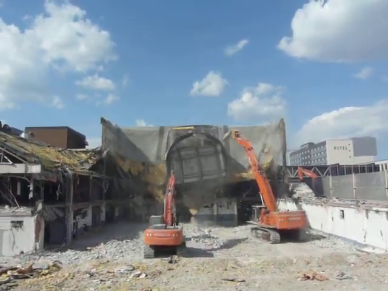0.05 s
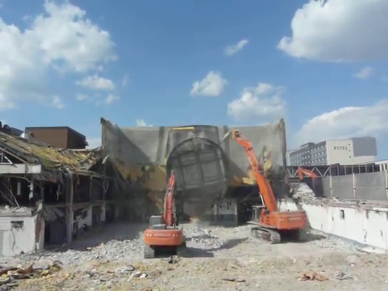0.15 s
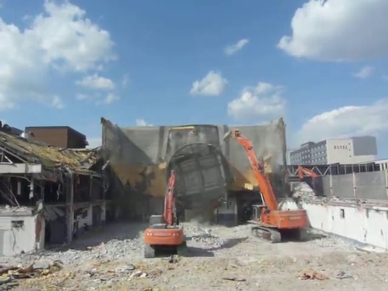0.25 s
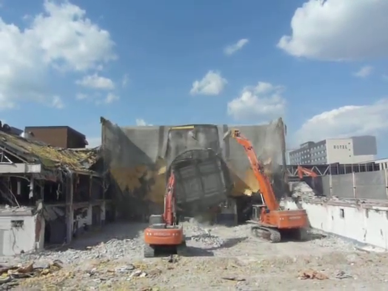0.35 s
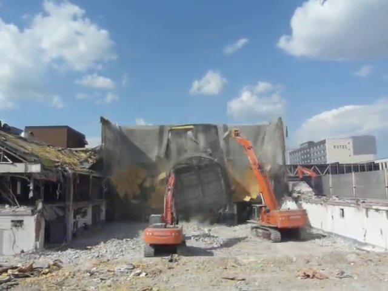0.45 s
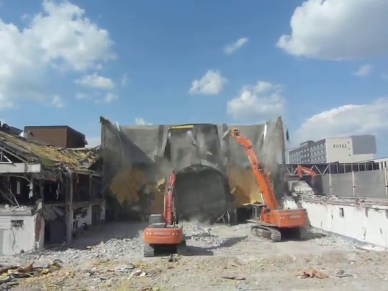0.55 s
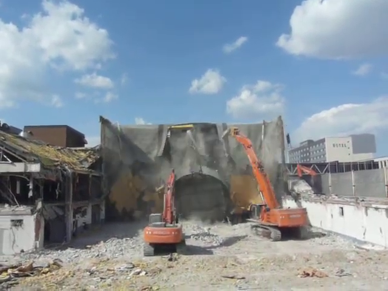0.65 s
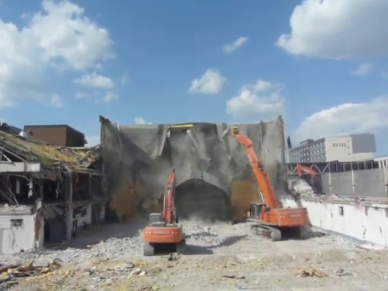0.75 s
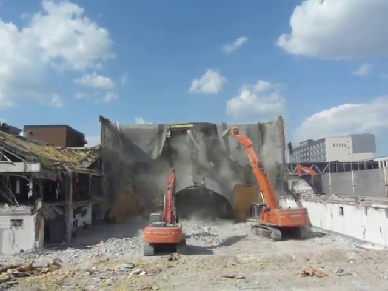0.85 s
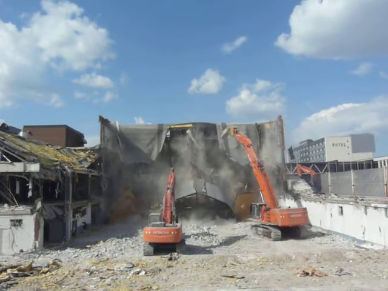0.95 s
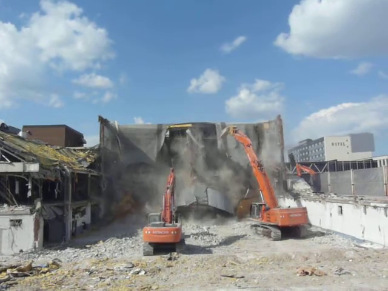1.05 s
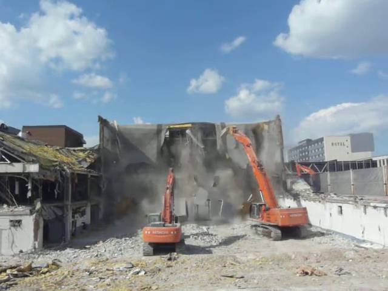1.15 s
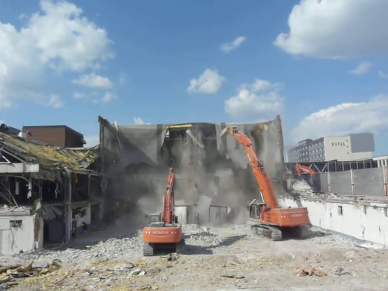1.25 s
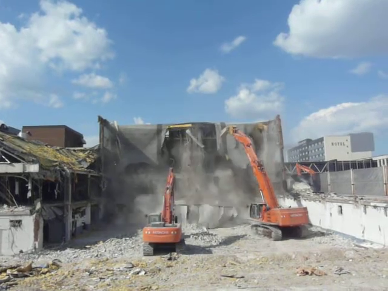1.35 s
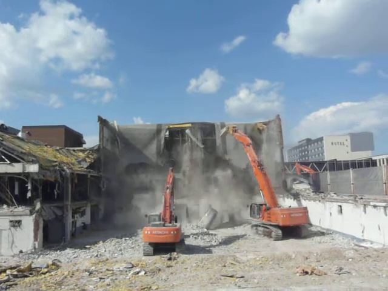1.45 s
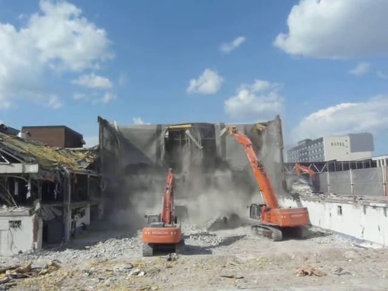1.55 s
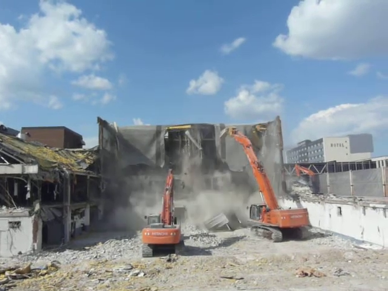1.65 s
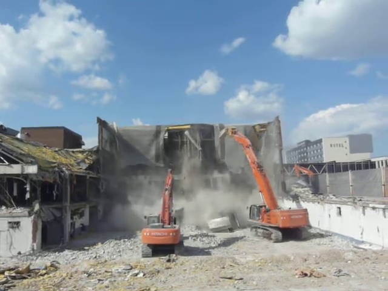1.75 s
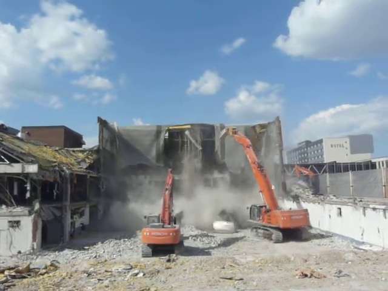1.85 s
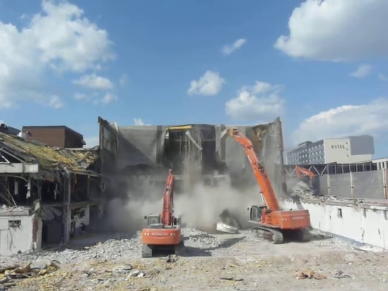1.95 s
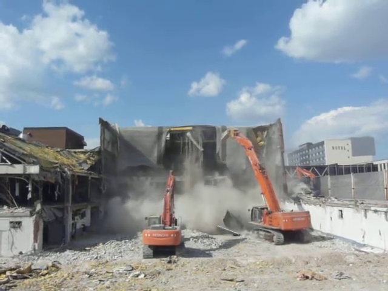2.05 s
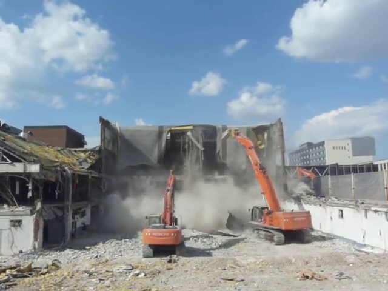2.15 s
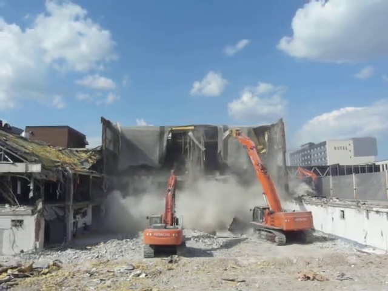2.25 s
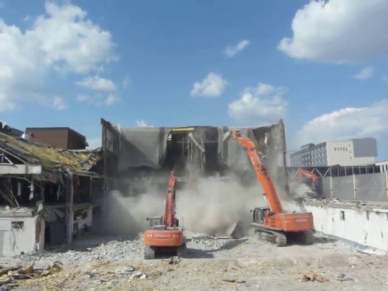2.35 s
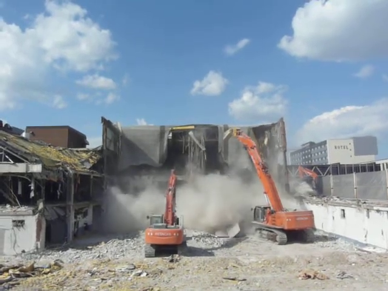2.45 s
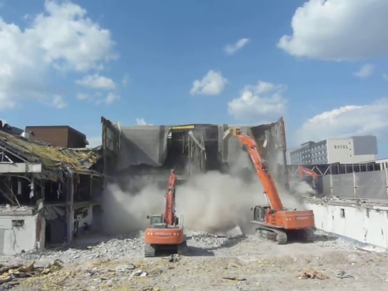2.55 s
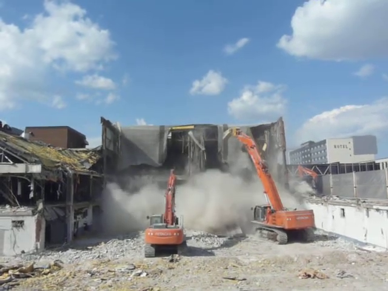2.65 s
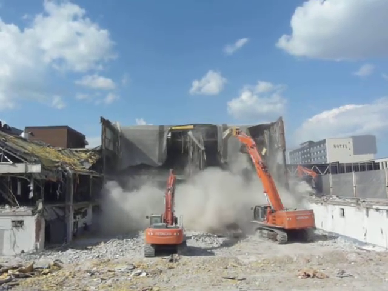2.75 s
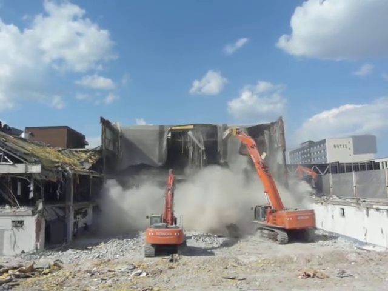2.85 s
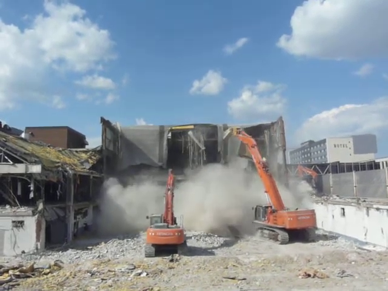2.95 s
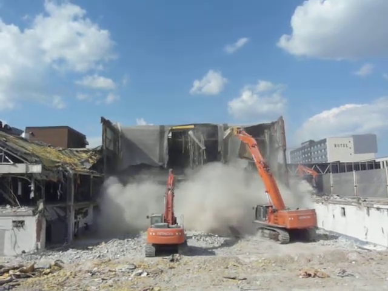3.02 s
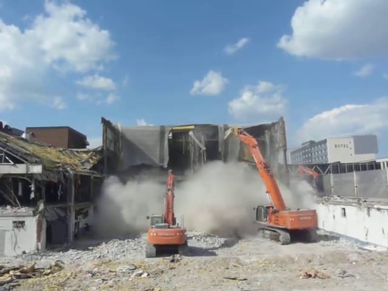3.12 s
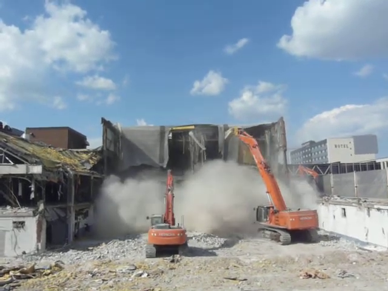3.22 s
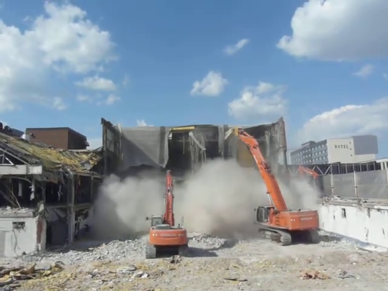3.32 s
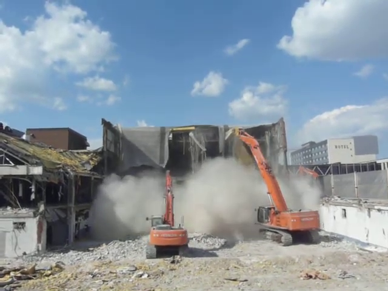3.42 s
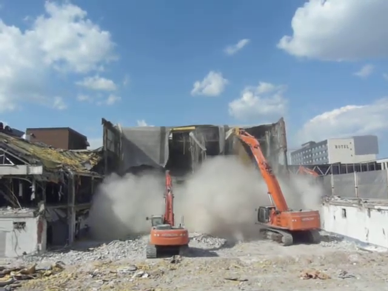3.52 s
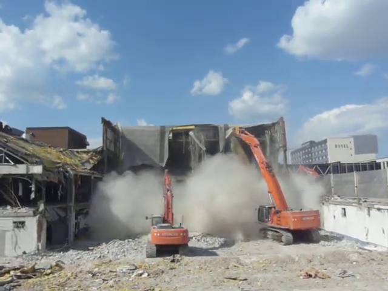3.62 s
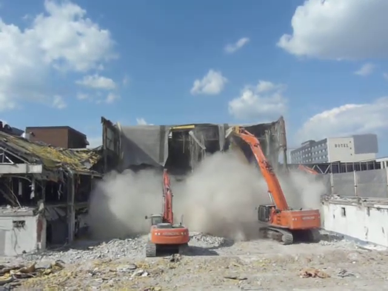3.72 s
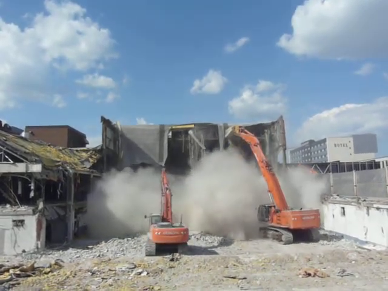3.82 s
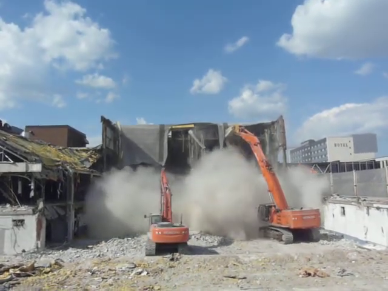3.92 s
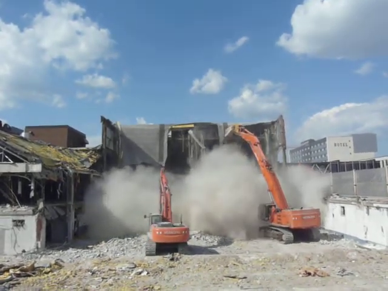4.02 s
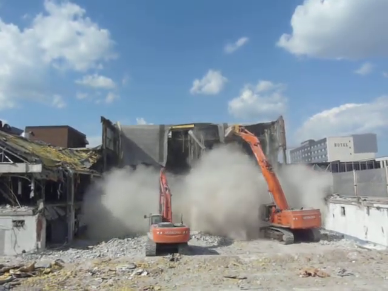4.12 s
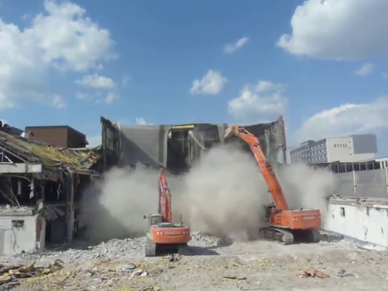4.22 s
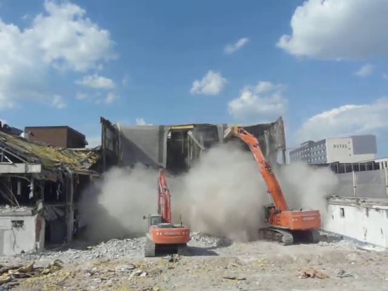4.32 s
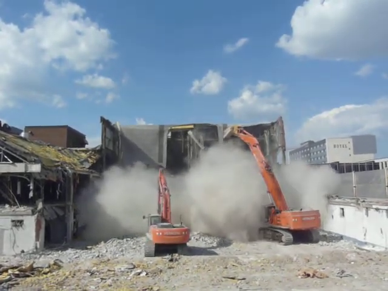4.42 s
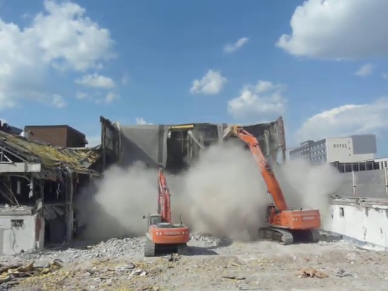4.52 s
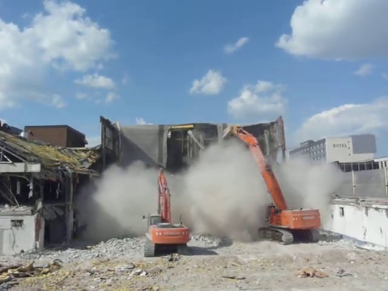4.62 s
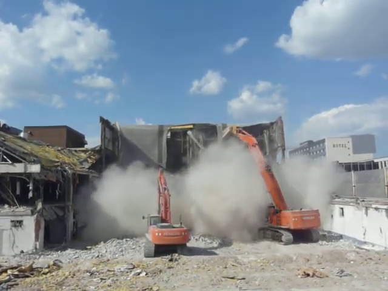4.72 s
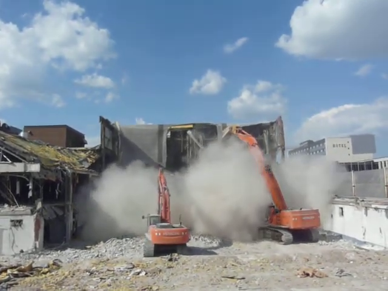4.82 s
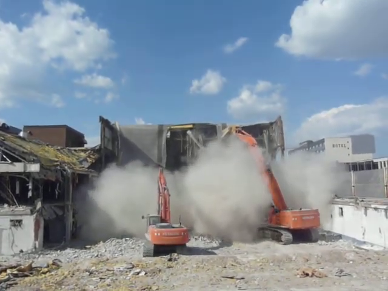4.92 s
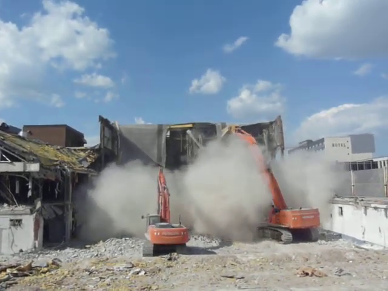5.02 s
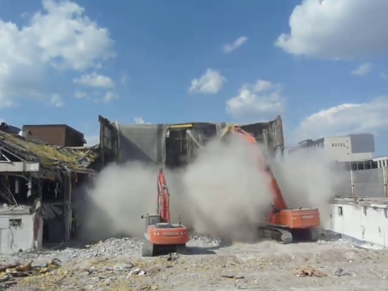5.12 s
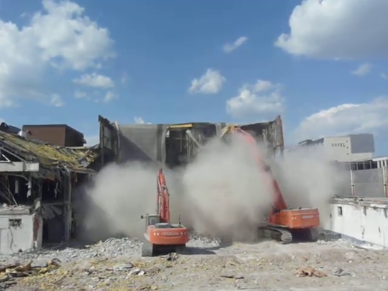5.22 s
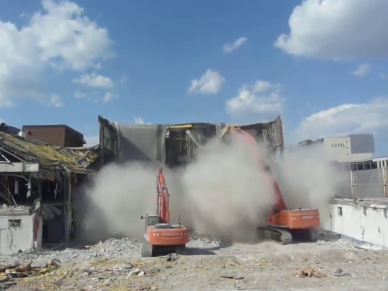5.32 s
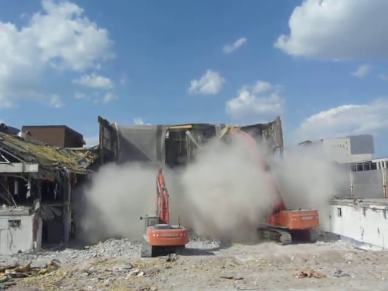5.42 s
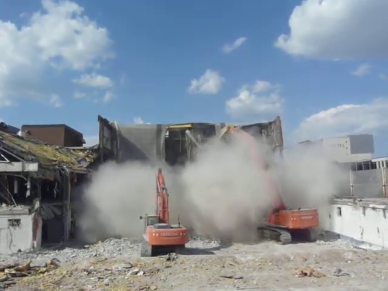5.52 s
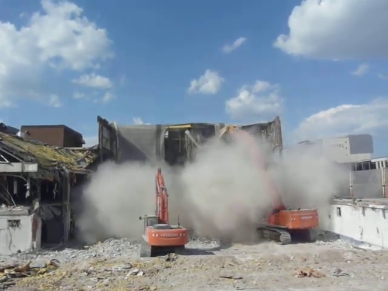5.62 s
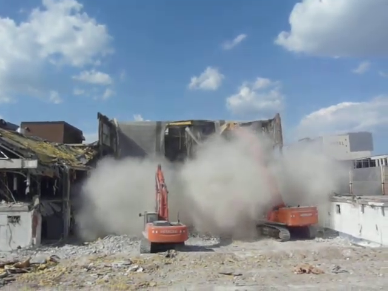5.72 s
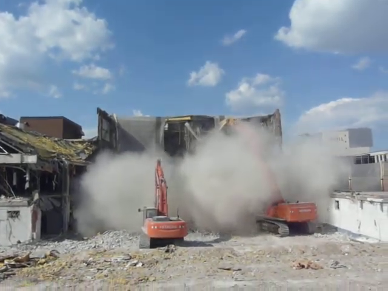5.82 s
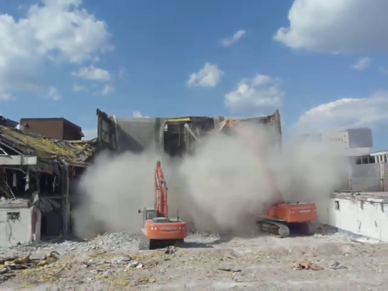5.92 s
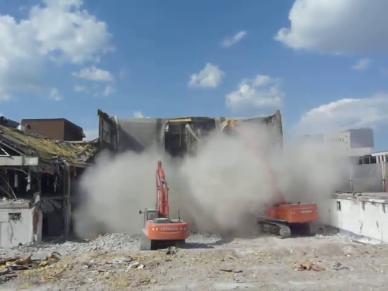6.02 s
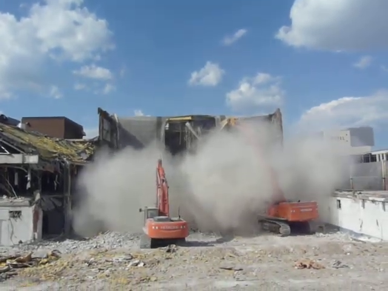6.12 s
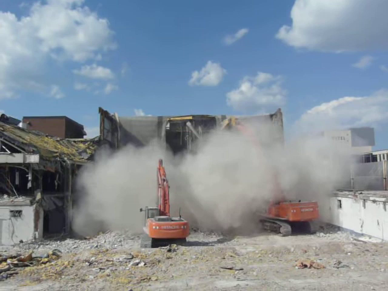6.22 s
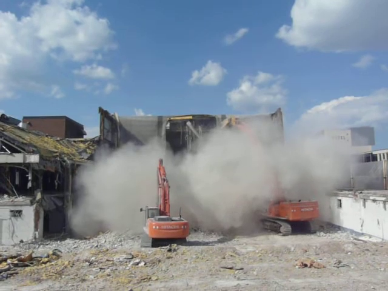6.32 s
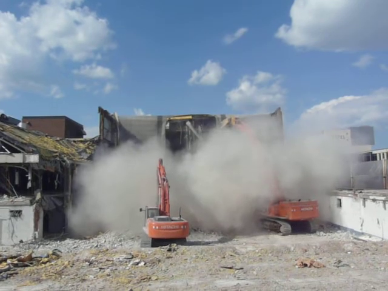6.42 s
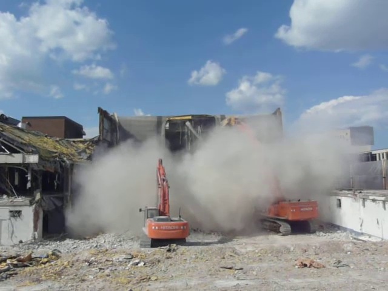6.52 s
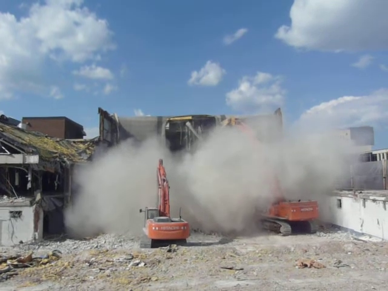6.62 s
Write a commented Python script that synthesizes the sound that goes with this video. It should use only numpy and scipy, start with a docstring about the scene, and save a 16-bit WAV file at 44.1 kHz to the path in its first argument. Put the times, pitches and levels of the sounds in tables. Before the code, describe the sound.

Outdoors, concrete rubble roars down, thins to a trickle, then slides and thuds again over low diesel drone, groaning machinery and brief metal squeals.

```python
"""A wall comes down on a demolition site, heard from across the yard.
Two diesel excavators beat, drone and groan as summed tones, over ground rumble of filtered contacts.
Slabs, blocks, bricks and grit pour down as streams of short rings; bursts of contacts thud, then also crack,
and the remaining walls throw these blows back. After a lull the heap gives way in short slides,
and steel squeals as resonating noise. A dull recorder rounds the peaks and adds one faint tick near 1 s."""
import sys
import numpy as np
from scipy import signal
from scipy.io import wavfile

SR = 44100
rng = np.random.default_rng(int(sys.argv[2]) if len(sys.argv) > 2 else 0)


def pcm_store(signal):
    """Save signal as 16-bit PCM."""
    levels = np.round(np.clip(np.atleast_2d(signal), -1, 1) * 32767)
    wavfile.write(sys.argv[1], SR, levels.astype(np.int16).T)


N = 293706
TIME = np.arange(N) / SR  # seconds


def from_db(db):
    """Decibels to gain."""
    return 10 ** (np.asarray(db) / 20)


def rms(x):
    """Root mean square level."""
    return np.sqrt(np.mean(x ** 2))


def rms_one(x):
    """Scale to rms 1."""
    return x / np.sqrt(np.mean(x ** 2) + 1e-20)


def in_time(rows):
    """Each column of a curve table at every sample."""
    seconds, *columns = np.transpose(rows)
    return [np.interp(TIME, seconds, column) for column in columns]


def at_hz(points, hz):
    """Read a spectrum on a log-frequency axis."""
    points_hz, values = np.transpose(points)
    return np.interp(np.log(hz), np.log(points_hz), values)


def band(x, low_hz, high_hz, order=2):
    """Butterworth band-pass."""
    edges = [low_hz, min(high_hz, .45 * SR)]
    sos = signal.butter(order, edges, "band", fs=SR, output="sos")
    return signal.sosfilt(sos, x + 1e-18)


def drift(rate_hz):
    """Slow chance with spread 1: noise through two equal low-pass poles at rate_hz."""
    step = 40  # samples between slow values
    r = np.exp(-2 * np.pi * step * rate_hz / SR)
    noise = rng.standard_normal(N // step + 2002)
    slow = signal.lfilter([1], [1, -2 * r, r * r], noise)[2000:]  # skip the filter's onset
    return np.interp(np.arange(N) / step, np.arange(len(slow)), rms_one(slow))


def resonate(x, hz, width_hz):
    """One resonance with gain 1 on top."""
    r = np.exp(-np.pi * width_hz / SR)
    numerator = np.array([1, 0, -1]) * (1 - r * r) / 2
    denominator = [1, -2 * r * np.cos(2 * np.pi * hz / SR), r * r]
    return signal.lfilter(numerator, denominator, x + 1e-18)


def add(out, s, sound):
    """Mix a sound in at time s."""
    start = int(np.clip(round(s * SR), 0, N - 1))
    out[start:start + len(sound)] += sound[:N - start]


def gate(s, attack, hold, release):
    """Rises to 1 from time s, stays until hold seconds after s, then falls to 0."""
    rise = (TIME - s) / attack
    fall = 1 - (TIME - s - hold) / release
    return np.clip(np.minimum(rise, fall), 0, 1)


def knocks(per_s, spread_db, size):
    """Random contacts of either sign: many light ones, a few heavy."""
    chance, weight = rng.random((2, size))
    at = np.flatnonzero(chance < per_s / SR)
    heaviness = np.minimum(-np.log(weight[at] + 1e-9), 4)
    clicks = np.zeros(size)
    clicks[at] = from_db(spread_db * heaviness) * (-1.) ** at
    return clicks


# The ground shaking. Each row: time in seconds, level in dB before the trim in ground().
GROUND_SHAKE = [(0.0, -45), (0.33, -49), (0.95, -41.5), (2.99, -56), (5.47, -41), (5.77, -45),
                (6.66, -43.5)]


def ground(trim_db=-1.5):
    """The heap passes the blows into the ground as a low rumble: contacts kept between 60 and 120 Hz."""
    level_db, = in_time(GROUND_SHAKE)
    rumble = band(knocks(470, 3.5, size=N), 60, 120, order=3)
    return from_db(level_db + trim_db) * rms_one(rumble)


# Effort of the engines. Each row: time in seconds, load from 0 to 1.
ENGINE_LOAD = [(0, .1), (1.5, .2), (3.0, 0), (3.7, .2), (3.82, .85), (4.8, .75), (6.66, 1)]


def excavators():
    """One diesel beats low and steady; the other drones unevenly. Load makes both louder and lifts the drone."""
    load, = in_time(ENGINE_LOAD)
    beat_db = -62 + 11 * load
    drone_db = -50 + 11 * load
    drone_hz = 121.3 + 11 * load
    beat_hz = 46.6 * (1 + 0.013 * drift(1.9))
    firing = 2 * np.pi * np.cumsum(beat_hz) / SR
    beat = np.sin(firing) + from_db(-9.0) * np.sin(2 * firing)
    turning = 2 * np.pi * np.cumsum(drone_hz * (1 + .018 * drift(12))) / SR
    # the drone swells and dips about 6.7 times a second, with chance on top
    swell = np.sin(2 * np.pi * 6.7 * TIME + drift(2))
    throb = 1 + 0.23 * swell + .4 * drift(14)
    drone = (np.sin(turning) + from_db(-9) * np.sin(2 * turning)) * throb
    return from_db(beat_db) * rms_one(beat) + from_db(drone_db) * rms_one(drone)


# The machines groan as they pull. Each row: start in seconds, length in seconds, centre pitch in Hz, level in dB.
PULLS = [(0, 3.1, 271, -37), (4.567, 0.22, 261, -35), (5.4, 0.27, 221.7, -36), (5.83, 0.28, 229, -33),
         (6.292, 0.58, 227, -38)]


def groans(attack_s=.07, fade_share=0.38):
    """Each pull draws a low, wavering tone from a machine; it starts quickly and fades."""
    waver = 1 + .02 * drift(14.6)
    flutter = from_db(3 * drift(24))
    out = 0
    for s, length, hz, level_db in PULLS:
        fade = fade_share * length
        phase = 2 * np.pi * np.cumsum(hz * waver) / SR
        tone = rms_one(np.sin(phase) * flutter)
        out = out + from_db(level_db) * gate(s, attack_s, length - fade, fade) * tone
    return out


# Steel dragging on steel. Each row: start in seconds, length in seconds, pitch in Hz, level in dB.
STEEL_SQUEALS = [(4.204, 0.057, 1900, -35.5), (6.08, 0.11, 1483, -34), (6.11, 0.065, 3090, -36.5),
                 (6.259, 0.1, 3063, -37.5), (6.258, 0.089, 1720, -35), (6.38, 0.44, 1530, -35.5),
                 (6.44, 0.12, 1600, -38.5)]


def steel(width_hz=22, size=20000):
    """Friction keeps one mode of a bar singing for a moment: noise through two equal resonances."""
    out = np.zeros(N)
    for s, length, hz, level_db in STEEL_SQUEALS:
        friction = rng.standard_normal(2 * size)
        tone = resonate(resonate(friction, hz, width_hz), hz, width_hz)[size:]  # already ringing
        swell = np.sqrt(np.abs(np.sin(np.pi * np.clip(TIME[:size] / length, 0, 1))))
        add(out, s, from_db(level_db) * rms_one(tone * swell) * rms(swell))
    return out


# Walls around the yard. Each row: delay in seconds, level in dB against the direct sound.
WALL_ECHOES = [(.014, -11), (.03, -10)]


def yard(x, tail_db, t60_s=0.48, size=40000):
    """A few wall echoes and a scattered tail, with the overall power kept."""
    response = rng.standard_normal(size) * from_db(-60 * TIME[:size] / t60_s)
    response *= from_db(tail_db) / np.linalg.norm(response)
    response[0] += 1  # direct sound
    for delay, level_db in WALL_ECHOES:
        scatter = rng.standard_normal(128) * np.hanning(128)  # a rough wall smears its echo
        add(response, delay, from_db(level_db) * scatter / np.linalg.norm(scatter))
    return signal.fftconvolve(x, response / np.linalg.norm(response))[:N]


def impacts(table, breadth, per_s, spread_db, rise_s, crush_s, t60, size=20000):
    """Each piece lands, crumbles for a moment and settles: a burst of contacts around its pitch."""
    out, age = np.zeros(N), TIME[:size]
    settling = from_db(-60 * np.maximum(age - crush_s, 0) / t60)
    shape = (1 - np.exp(-age / rise_s)) * settling
    for s, level_db, hz in table:
        clicks = knocks(per_s, spread_db, size=size)
        contacts = band(clicks, hz / (1 + breadth), hz * (1 + breadth), order=3)
        add(out, s, from_db(level_db) * rms_one(contacts * shape) * rms(shape))
    return out


# Heavy pieces landing. Each row: time in seconds, level in dB before the trim in thuds(), pitch in Hz.
HEAVY_LANDINGS = [(.125, -22.5, 280), (.22, -21.5, 226), (.67, -20, 270), (.95, -34, 85),
                  (1.23, -21.5, 302), (2.555, -18, 542), (3.355, -23, 488), (3.83, -23.5, 401),
                  (4.444, -25, 560), (4.66, -32, 254), (4.895, -19.5, 570), (5.045, -20, 518),
                  (5.27, -34, 85), (5.30, -24.5, 645), (5.42, -24, 510), (5.43, -29, 225),
                  (5.83, -23.5, 270), (5.925, -25, 526), (6.22, -22.5, 566), (6.51, -25, 240)]


def thuds(trim_db=-4.0):
    """Heavy pieces crush for a moment and settle slowly, so they sound low and soft-edged."""
    return from_db(trim_db) * impacts(HEAVY_LANDINGS, breadth=0.45, per_s=2000, spread_db=1.5,
                                      rise_s=0.008, crush_s=0.021, t60=0.18)


# Brittle pieces bursting on the heap. Each row: time in seconds, level in dB, pitch in Hz.
BRITTLE_BURSTS = [(1.32, -22.5, 1500), (1.375, -28, 2900), (1.41, -24.5, 1590), (1.54, -22.5, 1400),
                  (2.262, -26.5, 1146), (3.245, -30.5, 3900), (3.394, -33.5, 3700), (3.757, -29.5, 4200),
                  (3.88, -29.5, 1195), (3.93, -31, 3500), (4.21, -34, 3820), (4.62, -33, 3100),
                  (4.65, -27.5, 1190), (4.727, -27, 3700), (4.81, -24.5, 1200), (4.815, -30.5, 3200),
                  (4.855, -25.5, 1200), (5.034, -31, 2800), (5.05, -29, 1190), (5.628, -24, 1600),
                  (5.635, -25.5, 3600)]


def cracks():
    """Brittle pieces burst at once and settle fast, so they sound sharp."""
    return impacts(BRITTLE_BURSTS, breadth=.32, per_s=2500, spread_db=2.2,
                   rise_s=.001, crush_s=.027, t60=.085)


# The wall pours down, swells once more and thins to a trickle. Each row: time in seconds, flow in dB.
POUR_FLOW = [(0.0, -32), (0.61, -28.5), (0.88, -24.5), (1.52, -24.5), (3.11, -35), (3.56, -31.5),
             (4.2, -37)]
# How far heavy pieces outweigh fine ones in the flow. Each row: time in seconds, coarseness in dB.
FLOW_COARSENESS = [(0, 4.5), (.55, 0), (.8, -1.5), (1.5, -3.5), (2.65, 1.45), (3.6, -2.4), (4.3, 1),
                   (5.0, 6), (5.8, 5), (6.66, 8.5)]
# The heap gives way again and again. Each row: start in seconds, length in seconds, rise of the flow in dB.
HEAP_SLIDES = [(3.202, 0.21, 1.4), (3.768, 0.28, 1), (4.4, 0.51, 3), (5.278, 0.27, 2), (5.806, 0.23, 3),
               (6.2, 0.17, 0.5), (6.41, .3, 2)]
# Slabs, blocks, bricks, grit. Each row: level against the flow in dB before the trims in rubble(),
# share of the coarseness that it follows.
SIZE_BALANCE = [(-4.5, 1.0), (0.12, 0.84), (2, 0.46), (0.4, 0.2)]


def size_levels(attack_s=0.04, release_s=.1):
    """Level in dB of slabs, blocks, bricks and grit: all follow the flow, the bigger ones more of its coarseness."""
    flow_db, = in_time(POUR_FLOW)
    coarse_db, = in_time(FLOW_COARSENESS)
    for s, length, rise_db in HEAP_SLIDES:
        flow_db = flow_db + rise_db * gate(s, attack_s, length, release_s)
    return [flow_db + level_db + share * coarse_db for level_db, share in SIZE_BALANCE]


# Colour of the rubble within each size class. Each row: frequency in Hz, relative power per Hz in dB.
RUBBLE_COLOUR = [(85, -26), (120, -5.5), (165, -3), (270, -3), (370, -2), (510, 1.5), (660, 0.5), (820, -2),
                 (1060, -1), (1400, -4), (1750, -1.5), (2000, -2), (2600, -5.5), (3350, -7.5)]


def fragments(low_hz, high_hz, per_s, spread_db, damping, surge_db, count=24):
    """Fragments of one size class ring briefly at their own pitches; surge_db makes the stream come in clumps."""
    out = 0
    for hz in low_hz * (high_hz / low_hz) ** ((np.arange(count) + .5) / count):
        rings = resonate(knocks(per_s / count, spread_db, size=N), hz, damping * hz)
        # pitches lie further apart higher up, so each stands for a wider band
        out = out + rms_one(rings) * np.sqrt(hz) * from_db(at_hz(RUBBLE_COLOUR, hz))
    stream = band(out, 0.97 * low_hz, 0.94 * high_hz)
    return rms_one(stream * from_db(surge_db * drift(4.3)))


# Pitch borders in Hz, in order: under slabs, slabs to blocks, blocks to bricks, bricks to grit, above grit.
SIZE_BORDERS = [85, 380, 800, 2000, 4800]


def rubble():
    """Big pieces are few and low, small ones many and bright; bricks and grit flicker together."""
    slabs_db, blocks_db, bricks_db, grit_db = size_levels()
    flicker_db = 0.44 * drift(23)
    slabs = fragments(*SIZE_BORDERS[0:2], per_s=2000, spread_db=1.5, damping=0.1, surge_db=0.0)
    blocks = fragments(*SIZE_BORDERS[1:3], per_s=1800, spread_db=1.5, damping=0.044, surge_db=0.04)
    bricks = fragments(*SIZE_BORDERS[2:4], per_s=4000, spread_db=1.5, damping=0.048, surge_db=1.05)
    grit = fragments(*SIZE_BORDERS[3:5], per_s=7600, spread_db=1.0, damping=0.059, surge_db=0.13)
    coarse = from_db(slabs_db + 1.7) * slabs + from_db(blocks_db + 0.53) * blocks
    fine = from_db(bricks_db + 0.92) * bricks + from_db(grit_db + 1.08) * grit
    return coarse + from_db(flicker_db) * fine


def scene():
    """Rumble and engines under steel, blows with their echoes, and the pouring rubble."""
    machines = excavators() + groans()
    blows = yard(thuds() + cracks(), tail_db=-12.5)
    return (ground() + machines + steel() + blows + rubble())[None]


def overload(x, ceiling=.31):
    """Quiet sound passes almost unchanged; peaks are rounded off towards the ceiling (full scale 1)."""
    return x / (1 + (x / ceiling) ** 4) ** .25


def record(dry):
    """A dull recorder that overloads softly, with a small constant offset and one faint, bright tick."""
    treble_hz, cutoff_hz = 3880, 15900
    offset, tick_s = -.02, .9722
    dull = signal.firwin(121, treble_hz, window=("kaiser", 8), fs=SR)
    muffled = signal.fftconvolve(overload(dry), dull[None], mode="same", axes=1)
    tick = np.zeros(N)
    snap = from_db(-14) * np.exp(-TIME / .0003)
    add(tick, tick_s, band(snap, 1500, 19000, order=1))
    steep = signal.ellip(10, .2, 80, cutoff_hz, fs=SR, output="sos")
    return signal.sosfilt(steep, muffled + tick + offset)


dry = scene()
out = record(dry)
pcm_store(out)
```